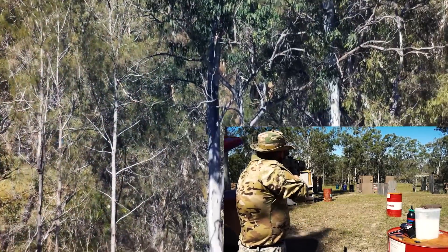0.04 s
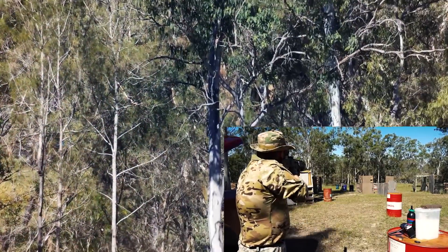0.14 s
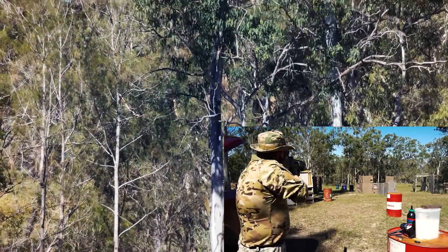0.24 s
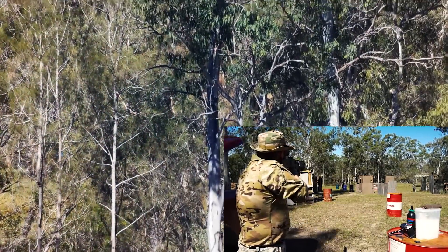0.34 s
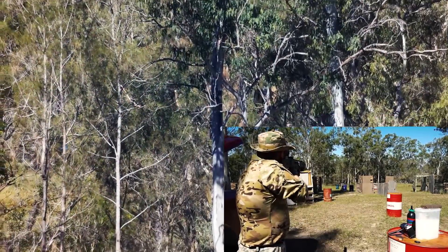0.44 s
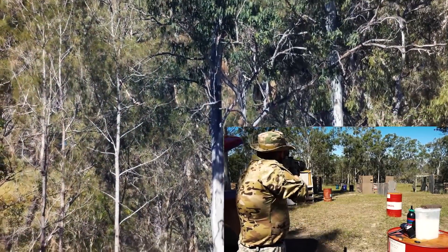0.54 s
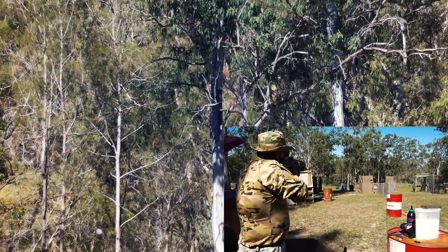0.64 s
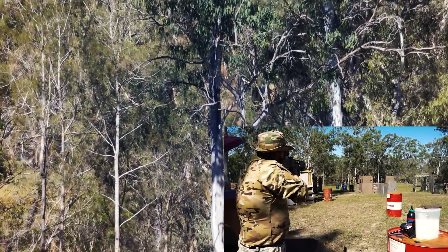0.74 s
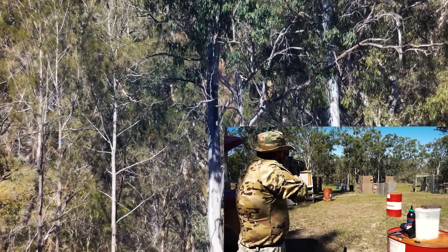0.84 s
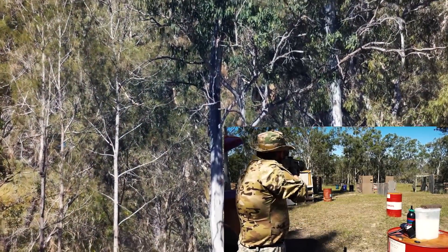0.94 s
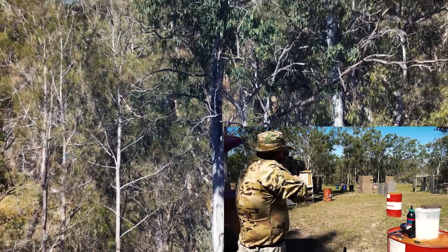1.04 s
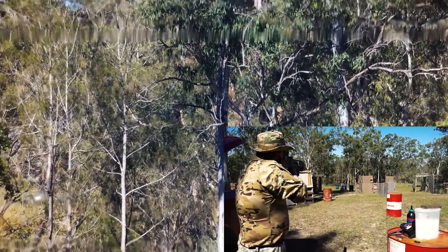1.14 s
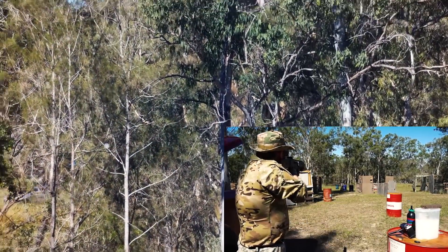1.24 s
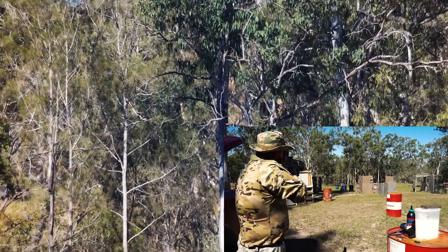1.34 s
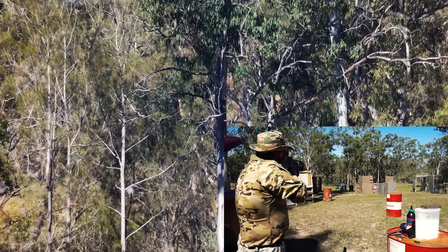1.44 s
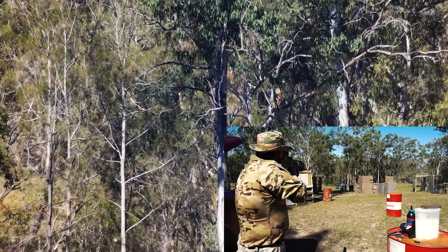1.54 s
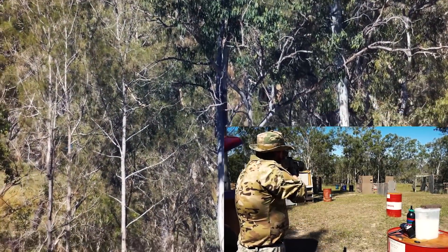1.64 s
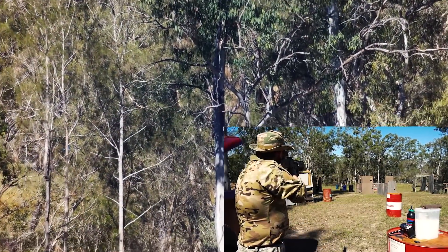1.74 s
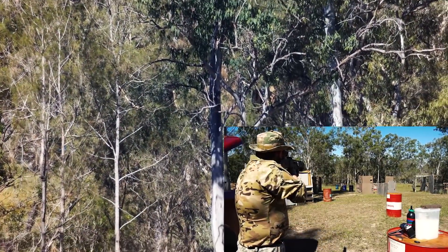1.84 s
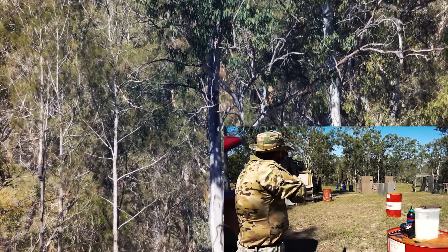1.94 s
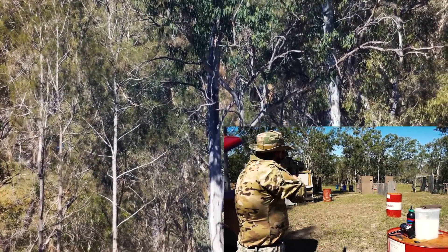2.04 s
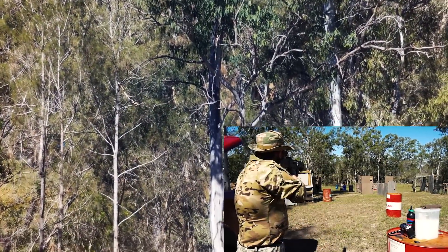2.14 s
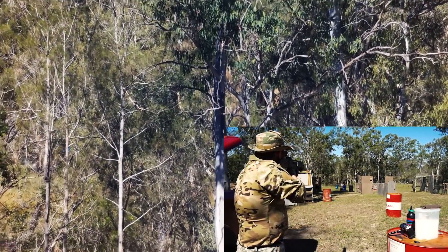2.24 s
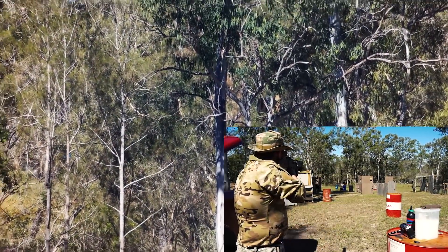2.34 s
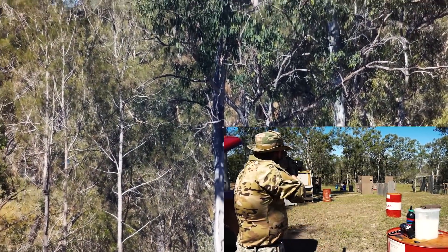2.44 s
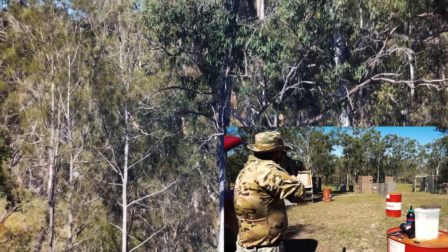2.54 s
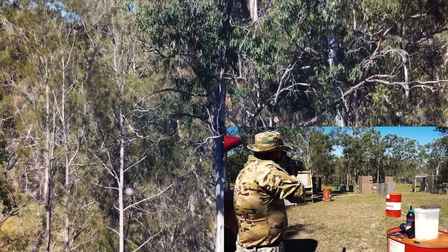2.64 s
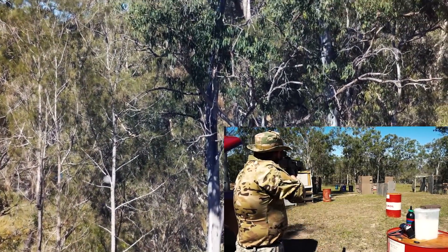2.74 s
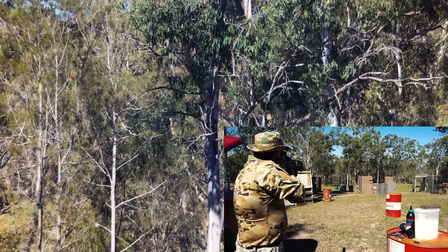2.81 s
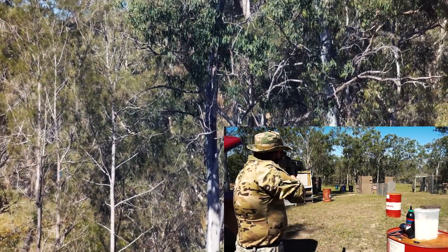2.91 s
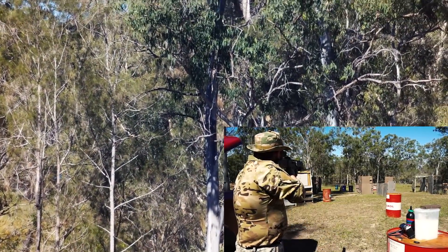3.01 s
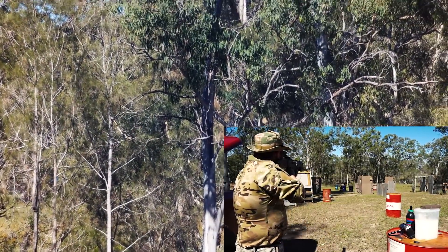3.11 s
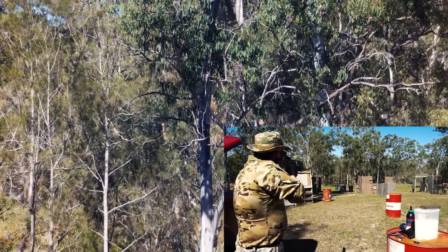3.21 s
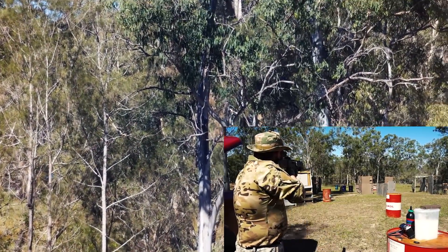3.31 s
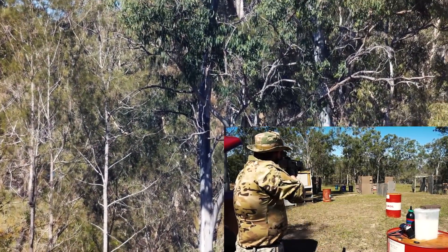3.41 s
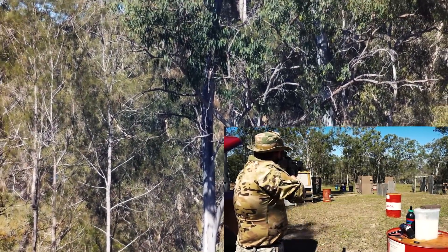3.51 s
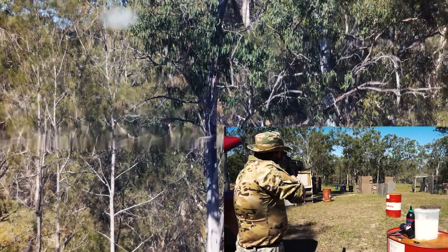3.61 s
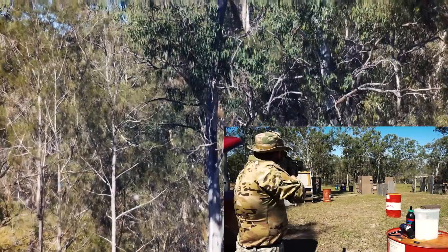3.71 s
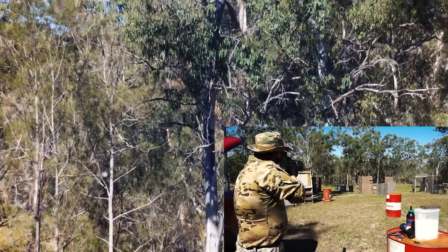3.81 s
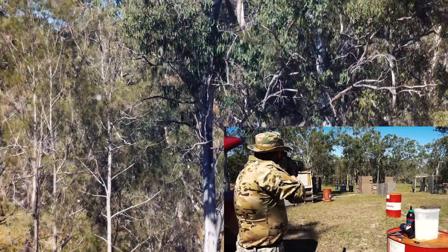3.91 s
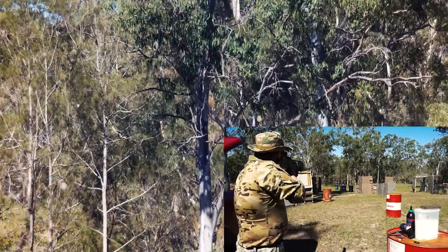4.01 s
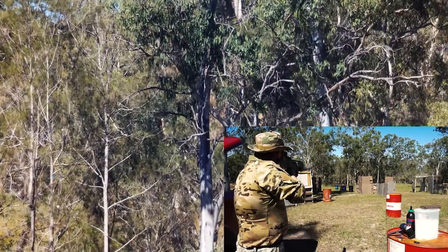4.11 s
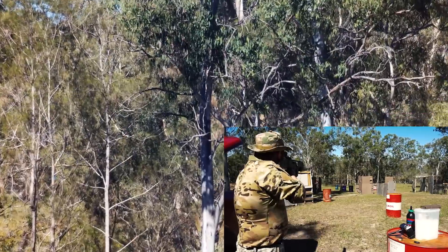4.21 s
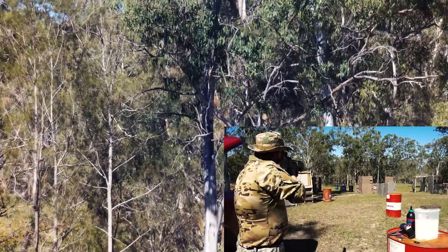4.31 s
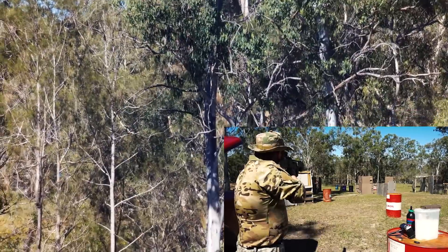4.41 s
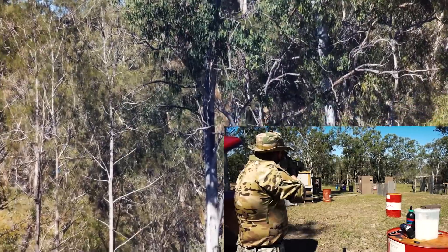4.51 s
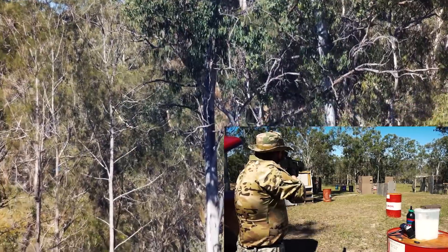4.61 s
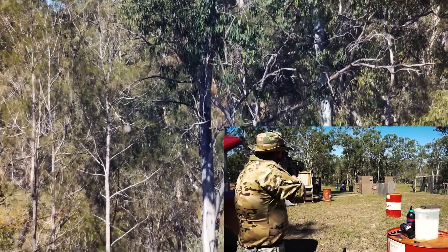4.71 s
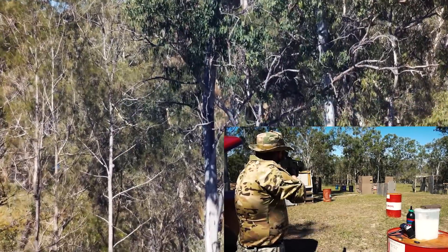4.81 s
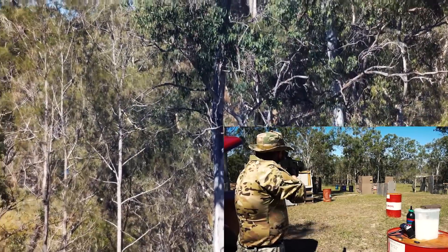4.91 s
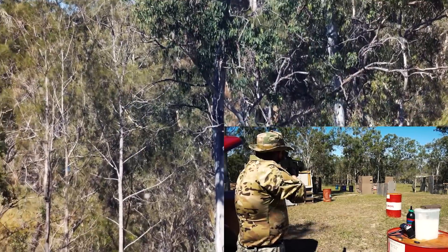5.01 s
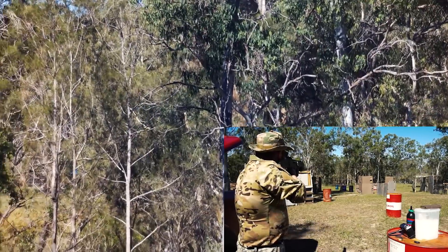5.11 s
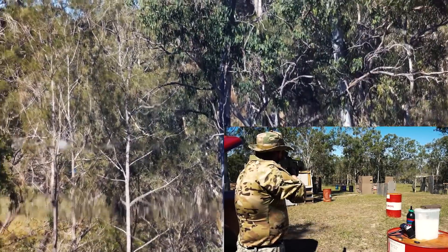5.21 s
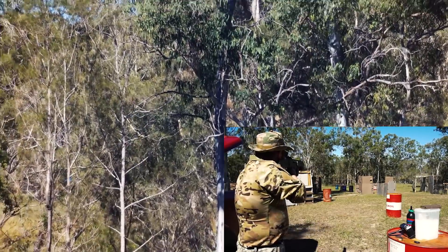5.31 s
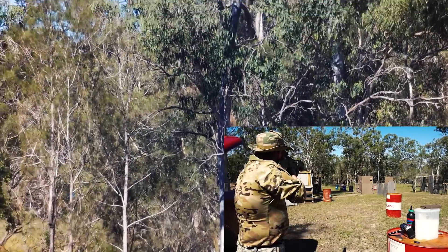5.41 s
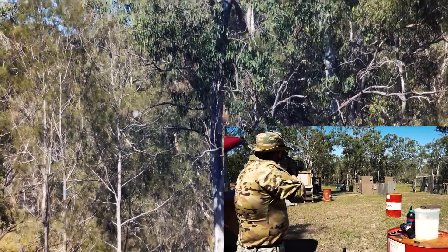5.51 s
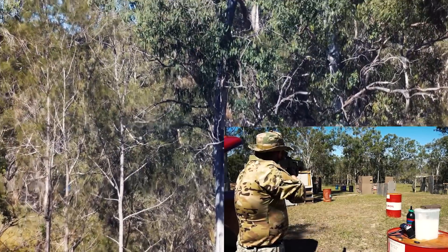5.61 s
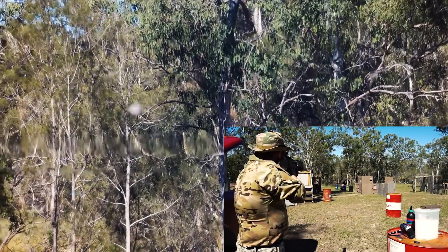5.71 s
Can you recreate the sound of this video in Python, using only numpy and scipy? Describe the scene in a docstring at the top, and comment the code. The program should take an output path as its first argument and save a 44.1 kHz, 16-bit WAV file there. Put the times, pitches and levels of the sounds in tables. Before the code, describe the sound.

Outdoors, low gusts of wind rumble on the microphone while a nearby battery-powered gel blaster whirs and clacks. It shoots once, lets off three short rapid bursts, and finishes with five evenly spaced single shots. The shots are crisp and fairly dry, with clicking gears and a piston knock, and a faint motor whirr runs on after them. Far behind lie a low drone and a few barely audible hoots.

```python
"""In a field, wind buffets the microphone over a far drone and faint hoots. An electric toy blaster fires
one gel ball, then bursts of three, three and four, then five single balls. At each trigger pull a motor
winds a spring through gears; each release gives a knock, a snap of air and the piston's thump, and the
loudest peaks clip. After the pull a faint whirr, perhaps the feed motor, runs on."""
import sys
import numpy as np
from scipy import signal
from scipy.fft import rfft, irfft, next_fast_len
from scipy.io import wavfile
from scipy.ndimage import uniform_filter1d, map_coordinates

SR = 44100
rng = np.random.default_rng(int(sys.argv[2]) if len(sys.argv) > 2 else 0)


def waveform_to_disk(signal):
    """Save audio, clipped to [-1, 1], as 16-bit WAV at the path in sys.argv[1]."""
    frames = np.transpose(np.atleast_2d(signal))
    scaled = np.clip(frames, -1, 1) * 32767
    samples = np.round(scaled).astype(np.int16)
    wavfile.write(sys.argv[1], SR, samples)


N = 253707

# Resonances of the motor pinion, the gear case and the shell: f/Hz, width/Hz, level/dB
PINION_MODES = [(3720, 520, 0), (4400, 300, -26)]
CASE_MODES = [(1654, 1270, -0.5), (2150, 720, -1.5), (2790, 470, 0.5), (3130, 300, -1)]
SHELL_MODES = [(411, 150, 0), (640, 286, 6.5), (776, 100, 7), (985, 214, 6), (1210, 1000, 2.5)]
# Trigger pulls: motor on t/s, off t/s, coasting/s, whine level/dB, then relative to the whine:
# first bite/dB, sag at the cut/dB, coasting/dB, rattle/dB, growl/dB, hiss/dB
TRIGGER_PULLS = [(0.393, 0.614, 0.033, -25.5, -8, -9, -15, 0.0083, 2.5, -8),
                 (1.074, 1.411, 0.12, -25.5, -1.5, -2.5, -15.5, 0.01, 1.9, -8),
                 (2.37, 2.711, 0.061, -25.5, -6.5, -11.5, -19, 0.0025, 0, -7),
                 (3.462, 3.949, 0.067, -25, -4, -7.5, -18, 0.0036, 0.22, -5.5),
                 (4.465, 4.671, .07, -25.5, -9, -10, -22.5, 0, 1.7, -5.5),
                 (4.788, 4.956, 0.091, -25.5, -6, -10.5, -16.5, 0.02, 3.6, -5),
                 (5.05, 5.205, 0.065, -26, -5, -11.5, -15.5, 0.015, 0.41, -6),
                 (5.314, 5.466, 0.068, -25.5, -4.5, -7.5, -22, 0, 3.9, -6.5),
                 (5.552, 5.709, 0.1, -26, -9, -6, -15.5, 0, 0.6, -6.5)]
# Piston strokes: t/s, slam level/dB, release knock/dB, rattle/dB and growl/dB added at the next catch
STROKES = [(0.4967, 1.5, -12, 6.6, 8), (1.0896, 0.5, -13, 7.8, 4.5), (1.202, 0.5, -12, 4.6, 5),
           (1.312, -1, -13, 4.9, -2.5), (2.4016, -1, -12, 8.2, 6.5), (2.5155, -3.5, -10, 7.9, 8),
           (2.6208, -2.5, -11, 1.3, -7), (3.5473, -4, -14.5, 7.5, 1), (3.658, -4.5, -9, 4.1, 3.5),
           (3.7602, -4, -14, 2.7, -2.5), (3.8675, -8.5, -13, 1.1, -23), (4.5618, -0.5, -9.5, 2.5, 6.5),
           (4.8585, -4, -6, 6.1, 1), (5.1065, 0, -13, 5.2, 4), (5.3678, 0.5, -19, 3.5, 1),
           (5.61, -1, -13.5, 6, 4)]
# Teeth catching the piston rack, trigger and stop clicks: t/s, level/dB, f/Hz
TAPS = [(0.39, -25, 2310), (0.5242, -24.5, 2410), (0.5574, -8, 3800), (0.597, -15.5, 3530),
        (0.6104, -21, 3750), (1.0286, -42.5, 3580), (1.1302, -5.5, 2290), (1.158, -10, 2900),
        (1.2376, -18.5, 3060), (1.3365, -8, 3270), (1.4486, -22.5, 3300), (1.4654, -28.5, 4550),
        (2.4324, -29.5, 2800), (2.4624, -13, 3930), (2.541, -12.5, 3290), (2.5706, -11, 1550),
        (2.6519, -15, 1870), (2.7111, -17.5, 3700), (3.5761, -10.5, 3080), (3.6816, -18.5, 3140),
        (3.784, -16, 3060), (3.9432, -18, 3890), (4.4525, -36.5, 4240), (4.4664, -14, 3550),
        (4.5945, -6.5, 2120), (4.6424, -18, 3530), (4.656, -17, 3800), (4.8873, -14, 2295),
        (4.9264, -11.5, 3700), (4.954, -18, 3660), (5.1388, -12, 1930), (5.202, -17, 3670),
        (5.3983, -11, 1837), (5.4632, -16, 3720), (5.6421, -6.5, 2080), (5.6744, -32, 4030),
        (5.7094, -25, 3800)]
TOOTH_HZ = 326.6  # main gear contacts at full speed
SAG_AFTER_S = .05  # the motor sags this long after a pull's last slam


def amp(db):
    """Amplitude ratio of a level in decibels."""
    return 10 ** (np.asarray(db) / 20)


def unit(x):
    """Normalisation to rms 1."""
    return x / np.sqrt(np.mean(x ** 2) + 1e-20)


def along(points, hz):
    """Interpolation of (f/Hz, value) points on a logarithmic frequency axis."""
    f, values = np.transpose(points)
    return np.interp(np.log(hz + 1), np.log(f + 1), values)


def curves(rows):
    """Linear interpolation, sample by sample, of each column after t/s."""
    times, *columns = np.transpose(rows)
    return [np.interp(np.arange(N) / SR, times, column) for column in columns]


def wobble(rate):
    """Smooth random modulation with rate knots a second."""
    knots = rng.standard_normal(int(N * rate / SR) + 4)
    return map_coordinates(knots, [np.arange(N) * rate / SR])


def filtered(x, response):
    """Linear filtering: the spectrum times a complex frequency response."""
    size = next_fast_len(len(x) + 8192)
    return irfft(rfft(x, size) * response(np.fft.rfftfreq(size, 1 / SR)), size)[:len(x)]


def coloured(x, spectrum):
    """Spectral shaping by (f/Hz, level/dB) points, rms 1."""
    return unit(filtered(x, lambda hz: amp(along(spectrum, hz))))


def resonant(x, modes, order=1):
    """Forced response of damped modes (f/Hz, width/Hz, level/dB), rms 1."""
    def response(f):
        return sum((-1) ** k * amp(db / order) * 1j * f * width / (hz * hz - f * f + 1j * f * width)
                   for k, (hz, width, db) in enumerate(modes)) ** order
    return unit(filtered(x, response))


def add(out, start, sound):
    """Superposition of a short sound at start/s."""
    part = out[round(start * SR):][:len(sound)]
    part += sound[:len(part)]


def swell(t, rise, t60):
    """Exponential rise and decay from t = 0."""
    t = np.maximum(t, 0)
    return (1 - np.exp(-t / max(rise, 1e-4))) * amp(-60 * t / t60)


def noise(length=N):
    """White Gaussian noise."""
    return rng.standard_normal(length)


def far_noise():
    """Broadband noise gives a rumble and a far hiss; narrowband noise, a wavering hum and a drone."""
    rumble_spectrum = [(50, -36.5), (100, 0.5), (125, -1.5), (150, -5), (200, -24), (800, -140)]  # f/Hz, level/dB
    rumble_levels = [(0, -39), (.6, -41), (.9, -43.5), (1.5, -45), (2.5, -53), (3.2, -45), (3.7, -54),
                     (4.15, -39.5), (4.5, -50), (5.75, -57)]  # t/s, level/dB
    hiss_spectrum = [(100, -39), (170, -7.5), (220, -2.5), (310, -10), (450, -8.5), (900, -3.5),
                     (1600, -16), (2500, -22.5), (4000, -30), (7000, -42), (10000, -47), (16000, -68.5)]  # f/Hz, level/dB
    drone_band = (383, 40, 0)  # f/Hz, width/Hz, level/dB
    drone_levels = [(0, -70), (.6, -64), (.8, -58), (1.5, -59), (2, -58), (2.8, -58), (3.4, -60),
                    (4.2, -60), (4.5, -68), (5.75, -68)]  # t/s, level/dB
    hum = amp(-7.5) * resonant(noise(), [(92, 8, 0)], order=2)
    rumble = amp(curves(rumble_levels)[0]) * (coloured(noise(), rumble_spectrum) + hum)
    hiss = amp(-47.5 + 1.5 * wobble(3)) * coloured(noise(), hiss_spectrum)
    drone = amp(curves(drone_levels)[0] + 2 * wobble(6)) * resonant(noise(), [drone_band], order=2)
    return rumble + hiss + drone


def hoots():
    """Random frequency modulation makes far, sinking tones breathy."""
    glides = [(.095, 0.083, 1087, 848, -39), (1.56, 0.048, 935, 877, -43.5), (1.8, 0.036, 1184, 1140, -40)]  # t/s, length/s, first f/Hz, last f/Hz, level/dB
    out = np.zeros(N)
    for start, length, from_hz, to_hz, db in glides:
        progress = np.linspace(0, 1, round(length * SR))
        jitter_hz = 900 * uniform_filter1d(noise(SR // 4), size=150)[:len(progress)]
        hz = from_hz + (to_hz - from_hz) * progress + jitter_hz
        envelope = amp(db) * np.sin(np.pi * progress ** .6)
        add(out, start, envelope * np.sin(2 * np.pi * np.cumsum(hz) / SR))
    return out


def wind():
    """Turbulent pressure on the microphone: a deep buffet and a higher flutter, swelling in gusts."""
    wind_levels = [(0, -22.5, -51), (.7, -40.5, -46), (1.2, -38, -42.5), (1.5, -32, -42), (2, -27.5, -44.5),
                   (2.5, -34, -39.5), (3, -26, -44.5), (3.5, -27.5, -39), (4.4, -25.5, -44),
                   (4.7, -44.5, -41), (5.2, -36.5, -43), (5.75, -41.5, -42)]  # t/s, buffet level/dB, flutter level/dB
    gusts = [(0.25, 0.018, 3, 13), (0.496, 0.02, 3, 21.5), (0.852, 0.18, 13, -2.5), (1.445, 0.065, 16, -1),
             (1.8, 0.023, 4, -12), (2.178, 0.063, 14.5, 18), (2.338, 0.041, 12.5, 1.5),
             (2.668, 0.046, 8.5, 14), (3.14, 0.048, 6, 9.5), (3.252, 0.055, 0.5, 8.5),
             (3.753, 0.041, 2, 1.5), (4.045, 0.038, 4, 0), (5.1, 0.031, 6.5, 15), (5.495, 0.029, 5, 3)]  # t/s, half width/s, buffet gain/dB, flutter gain/dB
    buffet_spectrum = [(5, -1), (12, 5), (30, -13), (60, -30), (120, -52.5), (400, -140)]  # f/Hz, level/dB
    flutter_spectrum = [(25, -44), (55, 10), (90, -4.5), (130, -18), (500, -140)]  # f/Hz, level/dB
    t = np.arange(N) / SR
    buffet_db, flutter_db = curves(wind_levels)
    for centre, half_width, buffet_gain, flutter_gain in gusts:
        gust = np.clip(1 - np.abs(t - centre) / half_width / 2, 0, 1)
        buffet_db += gust * buffet_gain
        flutter_db += gust * flutter_gain
    buffet = amp(buffet_db) * coloured(noise(), buffet_spectrum)
    return buffet + amp(flutter_db) * coloured(noise(), flutter_spectrum)


def echoes(x):
    """Scattering from ground and trees: a diffuse tail whose decay time depends on frequency."""
    decay_times = [(300, 0.15), (2000, 0.067), (6000, 0.041), (14000, 0.05)]  # f/Hz, t60/s
    hz, t, spectrogram = signal.stft(noise(SR // 3), SR, nperseg=256)
    decay = amp(-60 * t / along(decay_times, hz)[:, None])
    tail = signal.istft(spectrogram * decay, SR, nperseg=256)[1]
    return signal.fftconvolve(x, tail / np.linalg.norm(tail))[:N]


def ground_reflection(x):
    """Reflection off the ground returns a delayed, duller copy."""
    bounce = (.0066, -1, 1500)  # delay/s, level/dB, low-pass corner f/Hz
    delay, db, corner_hz = bounce
    return filtered(x, lambda f: amp(db) * np.exp(-2j * np.pi * f * delay) / (1 + 1j * f / corner_hz) ** 2)


def feed_whirr():
    """Faint motor noise excites the magazine's resonances, which shift as the grip changes."""
    runs = [(0, 0.272, -55, -63.5), (0.61, 1.032, -76, -63), (1.398, 1.869, -50, -59),
            (2.664, 3.12, -44.5, -59), (3.123, 3.184, -44.5, -84), (3.897, 4.371, -46.5, -58.5),
            (4.12, 4.26, -45, -76.5), (4.675, 4.994, -41, -52), (4.98, 5.274, -39, -60),
            (5.3, 5.737, -38, -52)]  # from t/s, until t/s, low level/dB, treble level/dB
    grips = [(2.201, [(834, 270, 1), (1167, 160, -9), (2150, 260, 9.5), (3094, 340, 9.5), (3540, 230, -5),
             (4150, 390, -13.5), (5480, 300, -21), (6670, 150, -11.5), (7660, 200, -18), (8170, 140, -19.5),
             (12300, 130, -22)]), (3.601, [(656, 140, -1), (1354, 75, -11.5), (1595, 180, -3),
             (2240, 300, -9.5), (3215, 250, -9), (4810, 130, -13.5), (5730, 100, -16), (7170, 740, -25),
             (8140, 390, -21), (8830, 110, -29.5), (11000, 150, -24)]), (6, [(620, 210, -4),
             (1364, 68, -19), (1950, 130, 4), (2960, 250, -2.5), (4560, 250, -15), (7030, 200, -17.5),
             (8550, 200, -22.5), (9560, 160, -22.5), (11500, 110, -29.5), (13550, 200, -35.5)])]  # until t/s, modes (f/Hz, width/Hz, level/dB)
    out, t, start = np.zeros(N), np.arange(N) / SR, 0
    low_gain, treble_gain = amp(-61.5), amp(-76)  # floor between runs
    for on, off, low_db, treble_db in runs:
        running = np.clip(np.minimum(t - on, off - t) / .03 + .5, 0, 1)  # 30 ms ramps
        low_gain += running * amp(low_db)
        treble_gain += running * amp(treble_db)
    for until, modes in grips:
        low = low_gain * resonant(noise(), modes[:2], order=2)
        treble = treble_gain * resonant(noise(), modes[2:], order=2)
        out += ((t >= start) & (t < until)) * (low + treble)
        start = until
    return amp(1.5 * wobble(12)) * out


def metal_ring():
    """Damped vibration: something metallic rings out faintly after the motor stops."""
    rings = [(0.622, -38.5, 3360, 500, 0.26), (1.445, -32.5, 3180, 910, 0.13),
             (1.658, -48.5, 3520, 1965, 0.19), (3.963, -41, 5820, 200, 0.2), (4.679, -37, 3350, 600, 0.12),
             (4.972, -37.5, 3380, 590, 0.22), (5.219, -41.5, 3420, 600, 0.26), (5.47, -39, 3370, 500, 0.31)]  # t/s, level/dB, f/Hz, width/Hz, t60/s
    out, t = np.zeros(N), np.arange(SR // 4) / SR
    for start, db, hz, width, t60 in rings:
        ring = resonant(noise(len(t)), [(hz, width, 0)], order=2)
        add(out, start, amp(db) * swell(t, .0025, t60) * ring)
    return out


def clicks():
    """Impact excitation of plastic: a damped tone over a crack through gear case and pinion."""
    out, t = np.zeros(N), np.arange(SR // 30) / SR
    envelope = swell(t, rise=.0004, t60=.013)
    for start, db, hz in TAPS:
        crack = resonant(noise(len(t)), CASE_MODES + PINION_MODES + [(9500, 3000, -20)])
        add(out, start, amp(db + 1.5) * envelope * (np.sin(2 * np.pi * hz * t) + .3 * crack))
    return out


def gear_levels():
    """Gear noise follows the load: effort and whine in dB; rattle, growl and hiss in dB re whine."""
    t, rows = np.arange(0, N + 22, 22) / SR, []
    slams, taps = np.transpose(STROKES)[0], np.transpose(TAPS)[0]
    for on, off, coast_s, db, bite, sag, coast, *layers in TRIGGER_PULLS:
        spin_up = [(on - .002, -120), (on, db + bite - 3), (on + .003, db + bite), (on + .025, db)]
        sagging = [(slams[slams < off].max() + SAG_AFTER_S, db), (off, db + sag)]
        stop = off + coast_s
        coasting = [(off + .0078, db + coast), (stop, db + coast - 18), (stop + .004, -120)]
        rows += [(time, level, *layers) for time, level in spin_up + sagging + coasting]
    times, *columns = np.transpose(rows)
    effort_db, rattle_db, growl_db, hiss_db = [np.interp(t, times, column) for column in columns]
    # Case and shell join in after the pinion.
    lag = sum((t > on - .002) * np.clip(1 - (t - on) / .037, 0, 1) for on, *_ in TRIGGER_PULLS)
    # The whine thins before each slam; the gears then run unloaded until the rack is caught with a shake.
    thinning = sum((t < slam) * np.clip(1 - (slam - t) / .06, 0, 1) for slam in slams)
    catches = [taps[taps > slam].min() for slam in slams]
    slack = sum(np.interp(t, [slam, slam + .013, catch - .002, catch], [0, 1, .21, 0])
                for slam, catch in zip(slams, catches))
    shakes = np.array([(t > catch - .002) * np.exp(-np.abs(t - catch) / .026) for catch in catches])
    shake_rattle_db, shake_growl_db = np.transpose(STROKES)[3:] @ shakes
    whine_db = effort_db - 9.5 * slack - 1.5 * thinning
    rattle_db += shake_rattle_db - 13 * lag - slack
    growl_db += shake_growl_db - 23.5 * lag
    hiss_db += 3 * shakes.sum(axis=0)
    return curves(np.transpose([t, effort_db, whine_db, rattle_db, growl_db, hiss_db]))


def shifting_modes(x, modes):
    """Forced response of modes that each swell on their own as the parts shift, rms 1."""
    return unit(sum(amp(db + 2 * wobble(30)) * resonant(x, [(hz, width, 0)], order=2) * np.sqrt(width)
                    for hz, width, db in modes))


def mesh_tones():
    """Harmonics of the tooth rate glide up with the motor and sink as it runs down."""
    harmonics = [(3, -3), (7, -6.5)]  # multiple of the tooth rate, level/dB
    slams, speeds = np.transpose(STROKES)[0], []  # speeds: t/s, share of full speed
    for on, off, *_ in TRIGGER_PULLS:
        full_from = min(on + .045, slams[slams > on].min() + .02)
        full_until = slams[slams < off].max() + SAG_AFTER_S
        speeds += [(on, .68), (full_from, 1), (full_until, 1), (off, .78)]
    cycles = np.cumsum(TOOTH_HZ * curves(speeds)[0] * amp(.25 * wobble(50))) / SR
    return sum(amp(db + 4 * wobble(70)) * np.sin(2 * np.pi * order * cycles) for order, db in harmonics)


def gears():
    """Tooth contacts modulate friction noise, which drives the resonances of pinion, case and shell."""
    hiss_spectrum = [(3500, -1.5), (5400, -2.5), (6200, -5), (7800, -17), (8800, -12), (9900, -8),
                     (11000, -12.5), (13000, -11.5), (16000, -17)]  # tooth hiss: f/Hz, level/dB
    effort_db, whine_db, rattle_db, growl_db, hiss_db = gear_levels()
    speed = np.clip(amp(.6 * (effort_db + 22.5)), .45, 1)  # a quiet motor is slow: single teeth stand out
    tooth_count = np.floor(np.cumsum(TOOTH_HZ * speed * amp(1.3 * wobble(60))) / SR)
    impacts = np.diff(tooth_count, prepend=0) * amp(2 * noise())
    contact = swell(np.arange(600) / SR, rise=.0004, t60=.016)
    teeth = signal.fftconvolve(impacts, contact)[:N] / np.sqrt(speed)
    scrape = (.36 * speed + teeth) * noise()
    hiss = amp(hiss_db) * coloured((.16 * speed + teeth) * noise(), hiss_spectrum)
    whine = resonant(scrape, PINION_MODES, order=2)
    rattle = amp(rattle_db) * shifting_modes(scrape, CASE_MODES)
    growl = amp(growl_db) * shifting_modes(scrape, SHELL_MODES)
    tones = amp(np.minimum(rattle_db, 0)) * mesh_tones()
    return amp(whine_db) * (whine + rattle + growl + hiss + tones)


def shots():
    """Release of stored energy: the rack slips, air snaps at the muzzle, the piston rings the cylinder."""
    snaps = [(0.493, -4.5, 5276), (1.0855, -3, 4760), (1.2068, -18, 5050), (1.3055, -4.5, 5750),
             (2.3963, -1, 5200), (2.5096, -2.5, 5530), (2.6145, -1.9, 5130), (3.5424, -1.7, 5410.0),
             (3.65, -2.6, 5140), (3.7543, -1.2, 4980), (3.8612, -0.5, 5300), (4.5613, -4.5, 4500),
             (4.8524, -2, 5890), (5.1022, -5.5, 6130), (5.3612, -5, 5240), (5.6043, -3.5, 5050)]  # air leaving the muzzle: t/s, relative level/dB, f/Hz
    air_spectrum = [(1500, -15.5), (3000, -5), (5500, -8), (8000, -10.5), (11000, -15), (16000, -16.5)]  # f/Hz, level/dB
    cylinder_modes = [(216, -36.5, 0.067), (268.2, -15, 0.05), (360, -7, 0.016), (503, -2.5, 0.02),
                      (811.7, 1.5, 0.026), (922, -4, 0.02), (1212, -3, 0.018), (1790, -4.5, 0.017),
                      (2250, -0.5, 0.01), (3540, -5.5, 0.016)]  # f/Hz, level/dB, t60/s
    out, t = np.zeros(N), np.arange(SR // 12) / SR
    for time, db, hz in snaps:
        air_noise, band_noise, tick_noise = rng.standard_normal((3, len(t)))
        air = coloured(air_noise, air_spectrum) + 1.7 * resonant(band_noise, [(hz, 900, 0)])
        add(out, time - .0045, amp(db + 17.5) * swell(t, .0052, .05) ** 3 * air)
        # The pitch rises 6 % a millisecond as the ball runs up the barrel; it leaves with a tick.
        whistle = np.sin(2 * np.pi * hz * t * (1 + 60 * t / 2) + tick_noise[0])
        add(out, time - .001, amp(db + 6.5) * swell(t, .001, .009) * whistle)
        tick = swell(t, .0001, .0018) * coloured(tick_noise, air_spectrum)
        add(out, time + .0045, amp(db - 6) * tick)
    for time, slam_db, knock_db, *_ in STROKES:
        knock = swell(t, .00017, .044) * resonant(noise(len(t)), SHELL_MODES + CASE_MODES)
        add(out, time - .0138, amp(knock_db) * knock)
        crack = .1 * swell(t, .0003, .013) * coloured(noise(len(t)), air_spectrum)
        thump = sum(amp(db + rng.normal(0, 1.5)) * swell(t, .69 / hz, t60) * np.sin(2 * np.pi * hz * t)
                    for hz, db, t60 in cylinder_modes)
        add(out, time, -amp(slam_db) * (thump + crack))
    return out


def scene():
    """Superposition of the near blaster, its reflections and the field around it."""
    blows = shots() + clicks()
    blaster = blows + gears() + metal_ring()
    reflections = ground_reflection(blows) + amp(-12) * echoes(blaster)
    return (blaster + reflections + feed_whirr() + hoots() + wind() + far_noise())[None]


def record(dry):
    """Saturation clips the loudest peaks; a low-pass filter limits the band."""
    top_hz = 15795
    clipped = dry[0] / (1 + np.abs(dry[0]) ** 8) ** (1 / 8)
    return filtered(clipped, lambda hz: np.clip((top_hz - hz) / 150, 0, 1) ** 2)[None]


dry = scene()
out = record(dry)
waveform_to_disk(out)
```